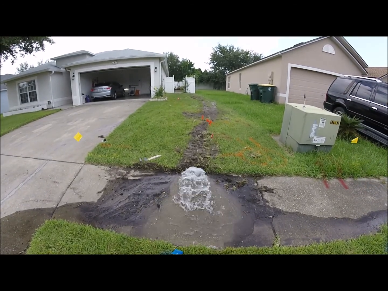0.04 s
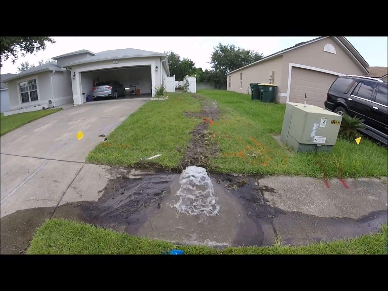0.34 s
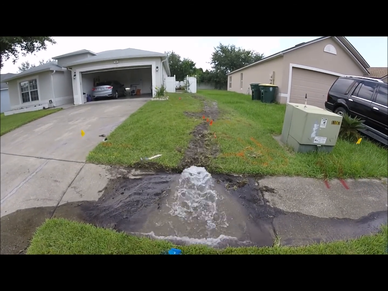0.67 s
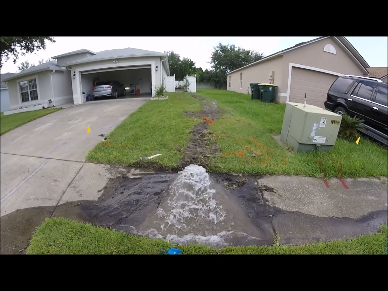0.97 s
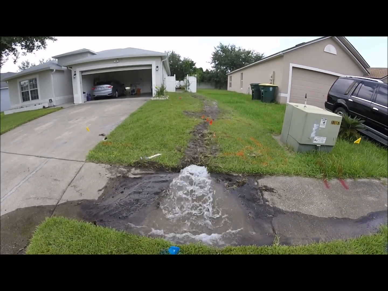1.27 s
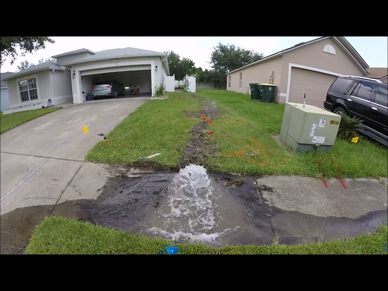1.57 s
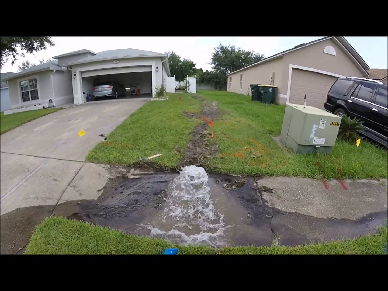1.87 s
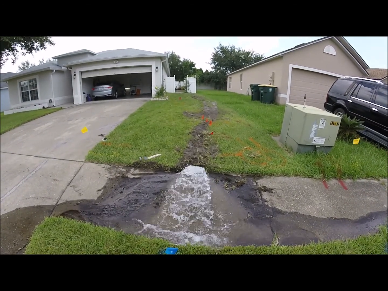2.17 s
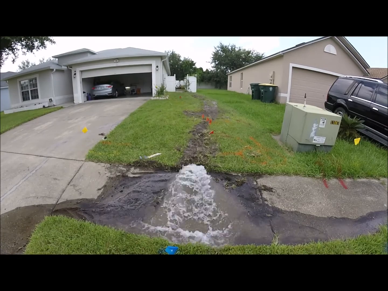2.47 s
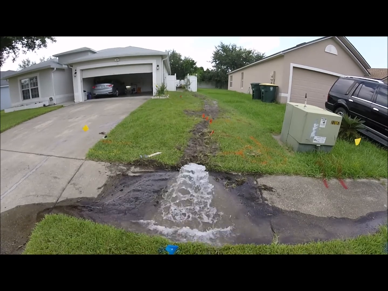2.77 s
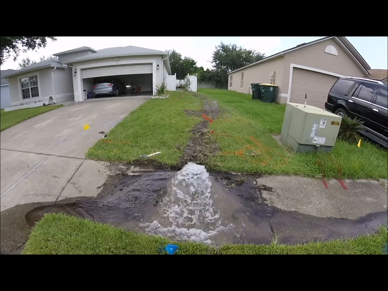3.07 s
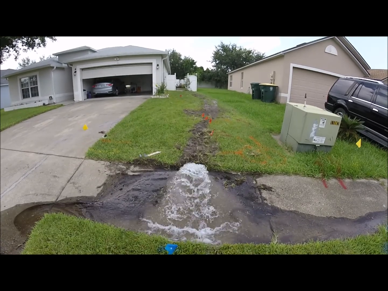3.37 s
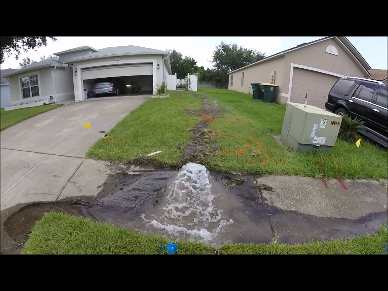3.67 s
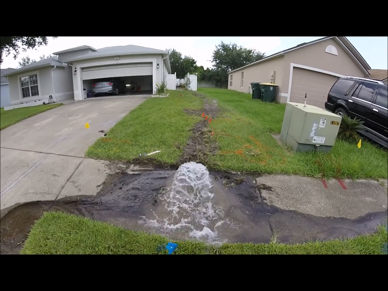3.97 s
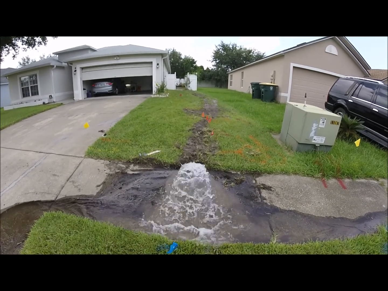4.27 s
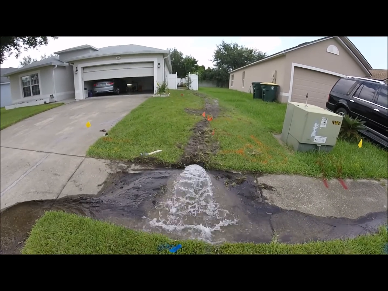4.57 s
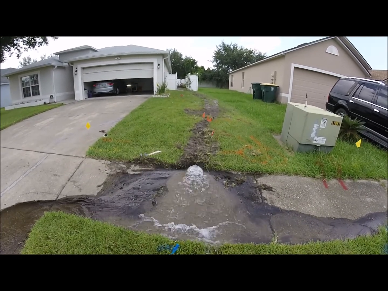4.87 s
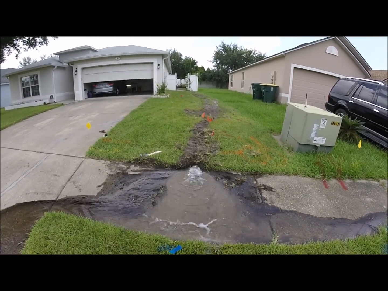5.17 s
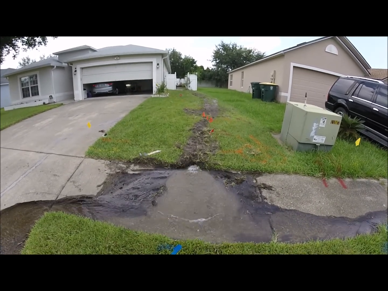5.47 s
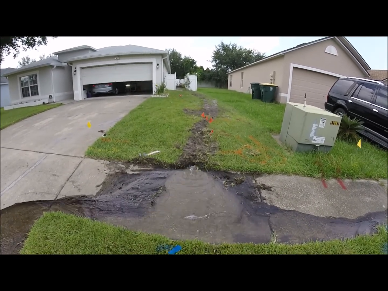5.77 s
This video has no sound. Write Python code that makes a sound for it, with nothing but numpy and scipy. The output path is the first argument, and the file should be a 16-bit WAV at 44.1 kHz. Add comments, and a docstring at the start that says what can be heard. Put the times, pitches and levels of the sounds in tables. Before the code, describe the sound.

Outdoors by a street, water gushes from a nearby drain and splashes over concrete, a bright, uneven spatter with hollow bubbling from the pipe. From the start, wind buffets the microphone with deep rumble and irregular thumps, often louder than the water and heaviest during the first three seconds. The flow builds in surges and is fullest from about 2.7 to 4.9 seconds, with a few wet slaps and bigger glugs. At about 2.9 and 3.3 seconds, two dull, faintly ringing bangs come from far down the street, the second one weaker. The gusts grow lighter after that but keep rumbling to the end. At about 5 seconds the flow shuts off quickly, leaving a couple of last glugs, single plinking drops and a faint trickle that fades by 5.8 seconds. A soft, dull outdoor hush slowly rises underneath.

```python
"""A lawn by a street, the microphone out in the wind near a drain. Water boils up out of the drain,
bubbles ringing in the pipe, and splashes over a concrete apron; the flow swells, shuts off and
trickles away. Gusts buffet the microphone with rumble and single thumping eddies.
Two dull bangs echo from far down the street, over a soft outdoor hush."""
import sys
import numpy as np
from scipy.fft import rfft, irfft, next_fast_len
from scipy.io import wavfile
from scipy.ndimage import map_coordinates

SR = 44100
rng = np.random.default_rng(int(sys.argv[2]) if len(sys.argv) > 2 else 0)


def wav_record(signal):
    """Record a signal, one row per channel, as 16-bit PCM in the file named by sys.argv[1]."""
    frames = np.transpose(np.atleast_2d(signal))
    bounded = np.clip(frames, -1, 1)
    # unit amplitude maps onto the largest positive 16-bit level
    quanta = np.round(bounded * 32767).astype(np.int16)
    wavfile.write(sys.argv[1], SR, quanta)


N = 257103

# loudness of the water as heard, ducking briefly twice; drives splash and gurgle: time_s, level_db
WATER_LEVEL = [(0.05, -49), (0.13, -45.5), (0.3, -40.5), (0.36, -49.5), (0.42, -40.5), (0.85, -41.5),
               (1.04, -37.5), (1.27, -43), (1.66, -36.5), (2.04, -43.5), (2.7, -35), (3.6, -36.0),
               (4.5, -35.5), (4.875, -37), (5.02, -48.5), (5.22, -49), (5.45, -56.0), (5.82, -60)]


def amp(db):
    """Decibels to gain."""
    return 10 ** (np.asarray(db) / 20)


def unit(x):
    """x at rms 1."""
    return x / np.sqrt(np.mean(x ** 2) + 1e-20)


def curve(points):
    """(time_s, value) points joined by straight lines, one value per sample."""
    return np.interp(np.arange(N) / SR, *np.transpose(points))


def wobble(rate_hz):
    """A smooth random curve with rate_hz knots a second."""
    knots = rng.standard_normal(4096)
    return map_coordinates(knots, [np.arange(N) * rate_hz / SR], mode="wrap")


def filtered(x, response):
    """x through a filter whose gain is response(hz)."""
    size = next_fast_len(N + SR // 2)
    return irfft(rfft(x, size) * response(np.fft.rfftfreq(size, 1 / SR)), size)[:N]


def muffled(x, cutoff_hz, order):
    """x with its treble rolled off."""
    return filtered(x, lambda hz: 1 / (1 + (hz / cutoff_hz) ** order))


def coloured(x, spectrum):
    """x shaped by (frequency_hz, gain_db) points, at rms 1."""
    points_hz, db = np.transpose(spectrum)
    return unit(filtered(x, lambda hz: amp(np.interp(np.log(hz + 1), np.log(points_hz), db))))


def noise(spectrum):
    """Fresh noise of that spectrum, at rms 1."""
    return coloured(rng.standard_normal(N), spectrum)


def scatter(start_s, waves):
    """Sum of short waves (rows), each starting at its time."""
    index = np.round(np.asarray(start_s) * SR).astype(int)[:, None] + np.arange(waves.shape[1])
    return np.bincount(np.clip(index, 0, N).ravel(), waves.ravel(), N + 1)[:N]


def burst(start_s, attack_s, t60_s):
    """Envelope that rises at start_s and dies away."""
    age = np.maximum(np.arange(N) / SR - start_s, 0)
    return (1 - np.exp(-age / attack_s)) * amp(-60 * age / t60_s)


def outdoor_hush():
    """A soft, dull hush all around, slowly swelling."""
    # colour of the hush: frequency_hz, gain_db
    hush_spectrum = [(30, 9), (130, -10), (280, -5.5), (500, -6), (750, -7.5), (970, 0), (1300, -10.5),
                     (1750, -13), (2400, -20), (5000, -48), (15000, -49)]
    # its swell: time_s, level_db
    hush_levels = [(0, -56), (2.3, -48), (3.2, -41), (5.1, -39), (5.8, -38)]
    return amp(curve(hush_levels)) * noise(hush_spectrum)


def far_bangs():
    """Blows on something that rings faintly, dulled by distance and smeared by echoes between houses."""
    # blows down the street: start_s, level_db, brightness_hz, t60_s
    blows = [(2.946, -18.5, 1430, 0.31), (3.257, -26, 660, 0.28)]
    # modes of the struck thing: pitch_hz, gain_db, t60_s
    ring_modes = [(422, -14.5, 1.0), (603, -16, 0.8), (743, -10.5, 0.53)]
    t = np.arange(N) / SR
    bangs = np.zeros(N)
    for start_s, level_db, bright_hz, t60_s in blows:
        dull = [(50, -15), (200, 0), (bright_hz * .91, -3), (bright_hz * 1.7, -15), (bright_hz * 3, -45)]
        bang = burst(start_s, .0032, t60_s) * noise(dull)
        for hz, gain_db, ring_t60_s in ring_modes:
            tone = np.sin(2 * np.pi * hz * t + .5 * wobble(30))
            bang += amp(gain_db) * burst(start_s, .0046, ring_t60_s) * tone
        bangs += amp(level_db) * bang
    return bangs


def gust(start_s, hold_s, slowness):
    """Envelope of one gust: it swells, holds and drops away; slowness stretches both slopes."""
    rise_s, fall_s = .053 * slowness, .023 * slowness  # per 20 dB
    t = np.arange(N) / SR - start_s
    outside_hold = np.maximum(-t / rise_s, 0) + np.maximum((t - hold_s) / fall_s, 0)
    return amp(-20 * np.minimum(outside_hold, 10))


def airflow():
    """Levels (dB) of rumble and turbulence: the strongest gust of the moment, or else the breeze."""
    # gusts on the microphone: start_s, hold_s, rumble_db, turbulence_db
    mic_gusts = [(0.01, 0.2, -23.5, -19), (0.21, .52, -21, -18), (0.77, 0.084, -36, -26),
                 (0.957, 0.079, -27.5, -23.5), (1.043, 0.18, -38, -21), (1.341, 0.06, -35.5, -31.5),
                 (1.538, 0.05, -23, -20.5), (1.617, 0.085, -21, -24.5), (1.757, 0.099, -13, -14.5),
                 (1.91, 0.047, -16.5, -23), (2.072, 0.048, -17.5, -22.5), (2.191, 0.0076, -23, -22.5),
                 (2.413, 0.13, -25.5, -40.5), (2.584, 0.11, -15.5, -26), (2.775, 0.16, -14.5, -23.5),
                 (2.992, 0.036, -23, -24.5), (3.056, 0.067, -29.5, -33.5), (3.382, 0.024, -23.5, -29.5),
                 (3.508, 0.081, -23.5, -39.5), (3.825, 0.13, -26.5, -41), (4.016, 0.046, -31, -27),
                 (4.218, 0.082, -26, -32), (4.342, .09, -27.5, -52), (4.543, 0.04, -20.5, -29),
                 (4.621, 0.092, -25.5, -45), (4.765, 0.071, -26.5, -46), (4.873, 0.043, -21.5, -28.5),
                 (5.039, 0.082, -29.5, -40.5), (5.276, .1, -25.5, -41), (5.422, 0.039, -24, -34.5)]
    rumble, turbulence = amp(-40), amp(-55)  # the breeze between gusts
    for start_s, hold_s, rumble_db, turbulence_db in mic_gusts:
        wake = amp(-10) * gust(start_s, hold_s, slowness=6.9)  # weak stirring around the gust
        slow = np.maximum(wake, gust(start_s, hold_s, slowness=1.25))
        quick = np.maximum(wake, gust(start_s, hold_s, slowness=.68))
        rumble = np.maximum(rumble, amp(rumble_db) * slow)
        turbulence = np.maximum(turbulence, amp(turbulence_db) * quick)
    return 20 * np.log10(rumble), 20 * np.log10(turbulence)


def wind(rumble_db, turbulence_db):
    """Air on the microphone: a slow rumble, and ragged turbulence that takes over in strong gusts."""
    # deep buffeting: frequency_hz, gain_db
    rumble_spectrum = [(10, -10), (25, -3), (55, 0), (100, 0), (170, -6), (280, -19), (500, -60),
                       (1200, -85)]
    # turbulent flutter: frequency_hz, gain_db
    flutter_spectrum = [(30, -25), (70, -13), (140, 2), (230, 4), (400, -2), (650, -13), (1000, -28),
                        (1500, -58), (2600, -64)]
    # hiss of the fastest swirls: frequency_hz, gain_db
    tearing_spectrum = [(250, 6), (550, 19), (900, 5.5), (1400, -5), (2000, -16), (3200, -30)]
    rumble = amp(rumble_db + 1) * unit(amp(3.15 * wobble(40)) * noise(rumble_spectrum))
    # light gusts break up in separate packets; strong ones flutter almost without a gap
    fullness = np.clip((turbulence_db + 27) / 4, -.5, 2.5)
    packets = 1 / (1 + np.exp(-3 * wobble(110) - fullness))
    swirl = unit((packets + .15) * amp(1.5 * wobble(250)))
    flutter = swirl * noise(flutter_spectrum)
    lows = muffled(flutter, cutoff_hz=330, order=4)
    # only a strong gust reaches high in pitch, where its fastest swirls tear apart
    tearing = amp(-17) * unit(swirl ** 2 * amp(5.8 * wobble(120))) * noise(tearing_spectrum)
    strength = 1 / (1 + amp(-47.5 - turbulence_db))
    return rumble + amp(turbulence_db) * (lows + strength * (flutter - lows + tearing))


def vortex(hz, t):
    """Pressure of a vortex passing at t = 0: it pushes, then sucks; a smaller one has a higher hz."""
    u = 2 * np.pi * hz * t
    return -u / (1 + u ** 2) ** 2


def small_vortices(turbulence_db):
    """Small vortices rattle past at random, following the level of the turbulence that sheds them."""
    when, pitch, strength = rng.random((260, 3)).T
    t = np.arange(-(SR // 100), SR // 100) / SR
    hz = 370 * 2 ** (pitch[:, None] - .5)
    swarm = scatter(when * N / SR, (.5 - strength[:, None]) * vortex(hz, t))
    return amp(turbulence_db - 12.5) * unit(muffled(swarm, cutoff_hz=1500, order=6))


def eddies():
    """Strong eddies hit the microphone one by one; the smaller the eddy, the sharper the thump."""
    # eddy strikes: time_s, level_db, centre_hz
    strikes = [(0.088, -7.5, 222), (0.275, -3, 273), (0.319, -7.5, 290), (0.41, -3.5, 330),
               (0.473, -6.5, 340), (0.506, -8, 304), (0.636, -5, 283), (0.663, -3.5, 278), (0.7, -9.5, 272),
               (0.943, -9, 196), (1.048, -1.5, 220), (1.079, -4, 206), (1.135, 1, 214), (1.205, -4, 194),
               (1.418, -15, 95), (1.632, -3.5, 274), (1.786, -8, 187), (1.913, -7, 250), (1.953, -5.5, 142),
               (1.996, -10, 107), (2.037, -4.5, 247), (2.195, -15, 257), (2.569, -8, 120),
               (2.674, -12.5, 123), (2.767, -6, 164), (2.883, -5.5, 304), (3.528, -13.5, 133),
               (4.013, -17.5, 239), (4.212, -8, 73.6), (4.346, -14, 73), (4.638, -12.5, 95),
               (5.337, -13.5, 72), (5.423, -13, 125)]
    time_s, level_db, hz = np.transpose(strikes)
    half = SR // 20
    t = np.arange(-half, half) / SR
    waves = vortex(hz[:, None], t)
    # five escorts, mostly smaller and weaker, travel just ahead of and behind each eddy
    escorts = rng.standard_normal((len(time_s), 5, 3)).transpose(1, 2, 0)[..., None]
    spread_s = .004544
    for lag, shrink, strength in escorts:
        escort_hz = hz[:, None] * np.exp(.35 + .25 * shrink)
        waves += .33 * strength * vortex(escort_hz, t - spread_s * lag)
    thumps = scatter(time_s - half / SR, amp(level_db + 10)[:, None] * waves)
    return muffled(thumps, cutoff_hz=1700, order=6)


def bubble_rings(hz, cycles, samples, rise=.02):
    """Sines that decay by 1/e in `cycles` periods and climb in pitch as each bubble nears the surface."""
    age = hz[:, None] * np.arange(samples) / SR / cycles
    phase = 2 * np.pi * cycles * (age + rise * age ** 2 / 2)
    return np.sin(phase) * np.exp(-age) * (1 - np.exp(-10 * age))


def bubbles(count, centre_hz, log_spread, spread_db, cycles, samples=900, rise=.02):
    """A random swarm of bubbles, many faint and a few loud, at rms 1."""
    when, pitch, strength = rng.random((count, 3)).T
    hz = centre_hz * np.exp(log_spread * (2 * pitch - 1))
    gain = amp(spread_db * np.minimum(-np.log(1 - strength), 4))
    return unit(scatter(when * N / SR, gain[:, None] * bubble_rings(hz, cycles, samples, rise)))


def trickle():
    """Faint drips and bursting foam run throughout, left exposed as the sheet of water runs off."""
    foam = bubbles(1100, centre_hz=4200, log_spread=.5, spread_db=3.5, cycles=3, samples=200, rise=0)
    drips = bubbles(1500, centre_hz=2500, log_spread=.8, spread_db=3.3, cycles=4, samples=700)
    return amp(-68) * foam + amp(-62.5) * drips


def last_drips():
    """Single drops plink on the wet concrete once the jet has collapsed."""
    # falling drops: start_s, level_db, pitch_hz
    plinks = [(4.9967, -37, 2130), (5.0211, -32, 2130), (5.061, -34, 2410), (5.09, -29, 3780),
              (5.1374, -37, 2630), (5.302, -37, 2930), (5.5565, -37, 2510), (5.6073, -41, 3230)]
    start_s, level_db, hz = np.transpose(plinks)
    return scatter(start_s, amp(level_db + 3)[:, None] * bubble_rings(hz, cycles=2.8, samples=900))


def gurgle():
    """Churned air rings as bubbles in the hollow pipe; its level swings less than that of the splash."""
    # hollow resonances of the outlet: pitch_hz, width_hz, gain_db
    outlet_modes = [(1017, 99, -6), (1393, 130, 5), (1715, 140, -1.5)]
    # big bubbles at the outlet: start_s, level_db, pitch_hz
    big_bubbles = [(2.213, -30, 1420), (3.623, -23, 1430), (3.957, -17.5, 1350), (4.425, -23, 1330),
                   (5.009, -25, 1350), (5.239, -27, 1270)]

    def pipe(hz):
        """The outlet's resonances, summed with alternating sign."""
        return sum((-1) ** k * amp(db) * 1j * hz * width / (pitch ** 2 - hz ** 2 + 1j * hz * width)
                   for k, (pitch, width, db) in enumerate(outlet_modes))

    swarm = bubbles(3500, centre_hz=1350, log_spread=.65, spread_db=2.6, cycles=3)
    churn = amp(.62 * curve(WATER_LEVEL) - 20.5) * unit(filtered(swarm, pipe))
    start_s, level_db, pitch_hz = np.transpose(big_bubbles)
    glugs = bubble_rings(pitch_hz, cycles=5.8, samples=2200, rise=.016)
    return churn + scatter(start_s, amp(level_db)[:, None] * glugs)


def drop_impacts(count, spread_db):
    """Sharp impacts at random moments, a few much harder than the rest, at rms 1."""
    when, strength, polarity = rng.random((count, 3)).T
    gain = amp(spread_db * np.minimum(-np.log(1 - strength), 5))
    return unit(scatter(when * N / SR, (gain * np.sign(polarity - .5))[:, None]))


def splash():
    """Spray, drop impacts and tiny bubbles arrive in clumps as the jet breaks up on the concrete."""
    # colour of water on concrete: frequency_hz, gain_db
    splash_spectrum = [(200, -38), (600, -46), (1050, -12.5), (1700, -4), (2050, -6), (2400, -2), (3200, 0),
                       (4700, -2.5), (6400, -9), (7600, -10), (9000, -17), (11000, -17.5), (12200, -22),
                       (15500, -29)]
    # lumps of water slapping the apron: start_s, level_db
    slap_hits = [(0.1144, -24.5), (2.7675, -18), (3.032, -16), (3.801, -16), (4.2407, -19), (4.505, -18.5)]
    water_db = curve(WATER_LEVEL)
    clumps = amp(.9 * wobble(22) + 1.2 * wobble(110) + .9 * wobble(450))
    spray = amp(-3) * noise(splash_spectrum)
    patter = amp(-4.5) * coloured(drop_impacts(14000, spread_db=3.5), splash_spectrum)
    # trapped air rings from pea-sized bubbles to fine fizz
    fizz = bubbles(9000, centre_hz=4800, log_spread=1.05, spread_db=4.6, cycles=8)
    water = spray + patter + amp(-4.5) * coloured(fizz, splash_spectrum)
    # coarse lumps and fine mist land at their own moments; quieter water carries less mist
    lumps = muffled(water, cutoff_hz=5500, order=4)
    mist = (water - lumps) * amp(.11 * (water_db + 44) + 2.03 * wobble(50) + 1.4 * wobble(330))
    landing = lumps * amp(1.2 * wobble(90))
    gush = amp(water_db + .88) * unit(clumps * (landing + mist))
    slaps = sum(amp(db - 7) * burst(start_s, attack_s=.00063, t60_s=.031) for start_s, db in slap_hits)
    return gush + slaps * noise(splash_spectrum)


def scene():
    """Water nearby, wind on the microphone and far bangs over the outdoor hush, in mono."""
    hush = outdoor_hush()
    water = splash() + gurgle() + trickle() + last_drips()
    rumble_db, turbulence_db = airflow()
    buffeting = wind(rumble_db, turbulence_db) + eddies() + small_vortices(turbulence_db)
    return (hush + far_bangs() + buffeting + water)[None]


def record(dry):
    """The microphone rounds off the hardest buffets; nothing is kept above the band limit."""
    ceiling, top_hz = .85, 15500
    rounded = dry[0] / (1 + np.abs(dry[0] / ceiling) ** 4) ** (1 / 4)
    return filtered(rounded, lambda hz: hz < top_hz)[None]


dry = scene()
out = record(dry)
wav_record(out)
```